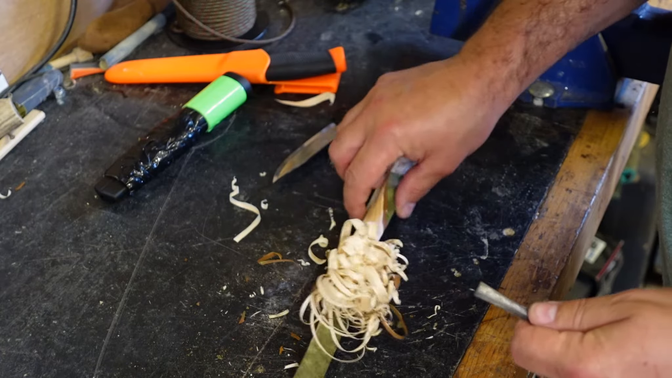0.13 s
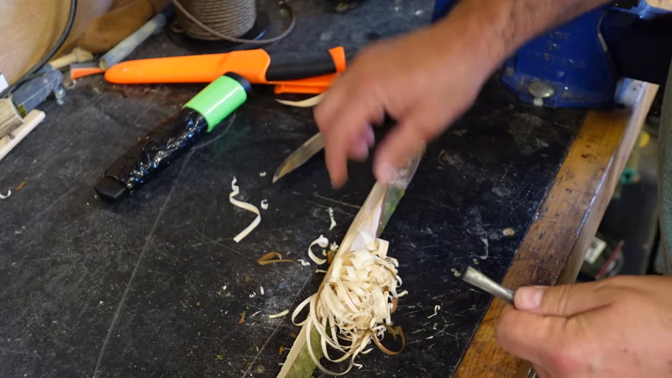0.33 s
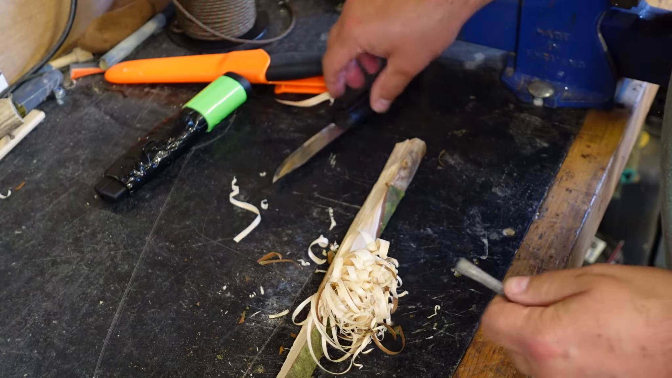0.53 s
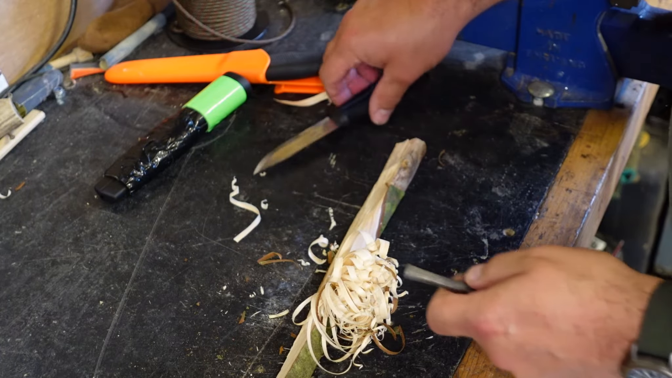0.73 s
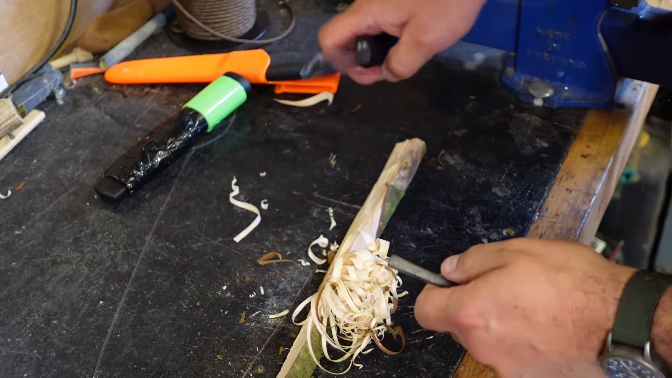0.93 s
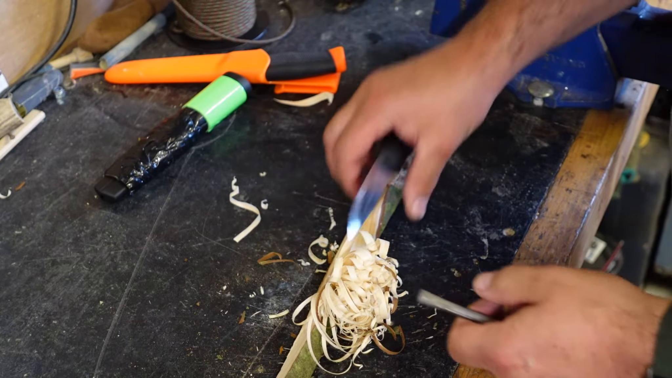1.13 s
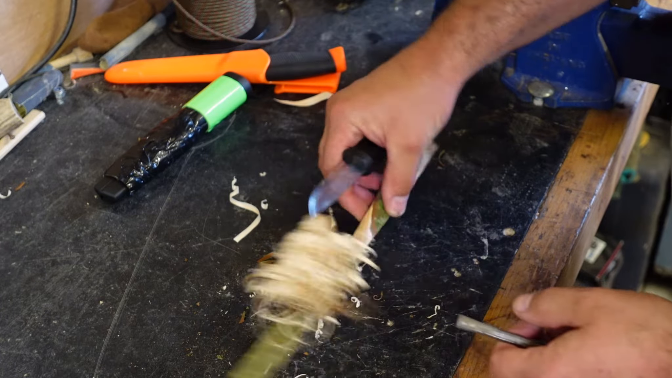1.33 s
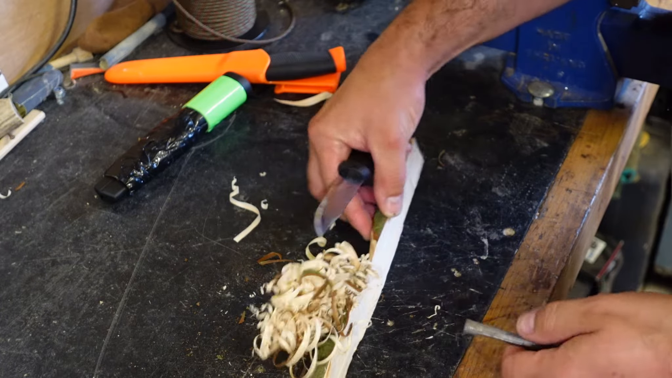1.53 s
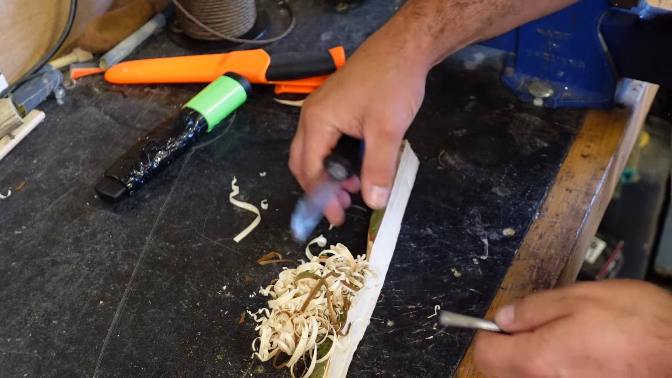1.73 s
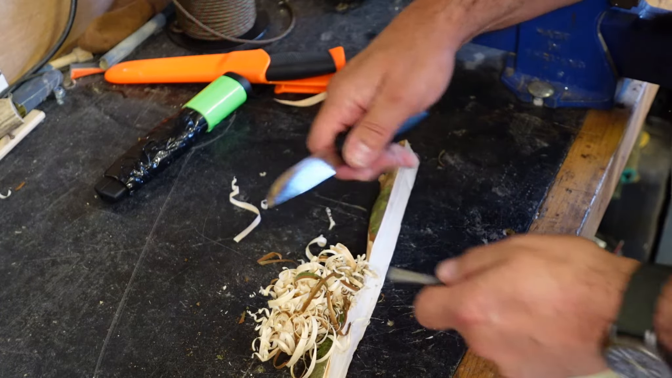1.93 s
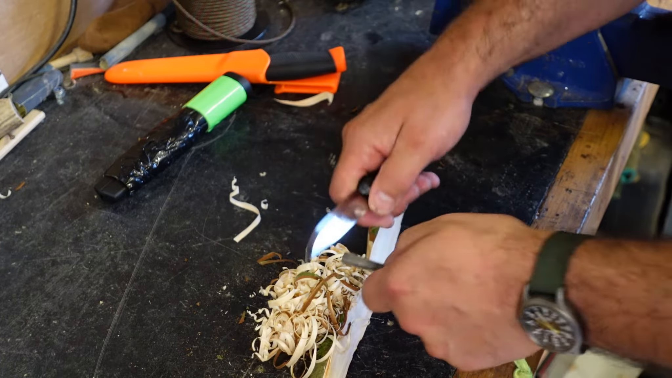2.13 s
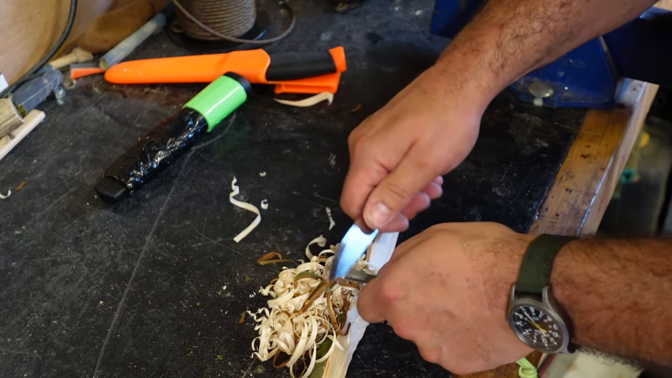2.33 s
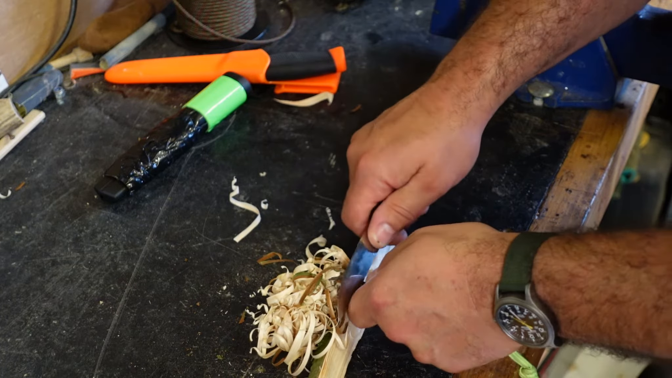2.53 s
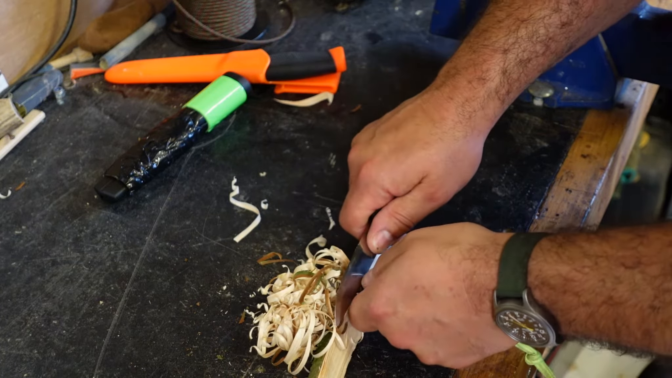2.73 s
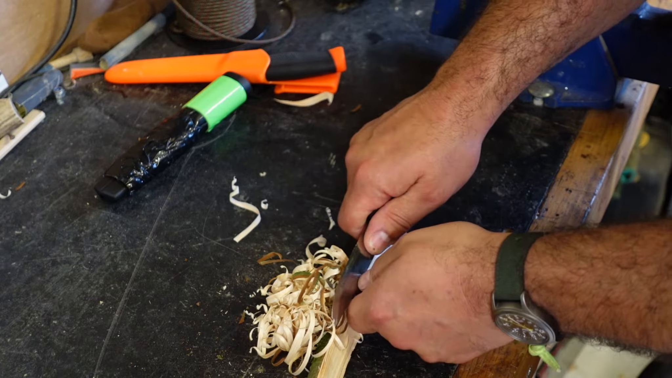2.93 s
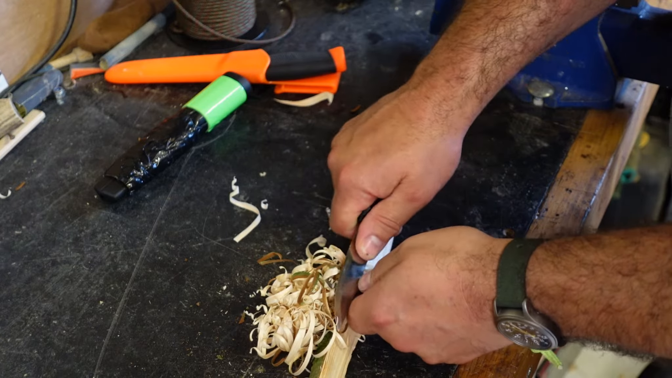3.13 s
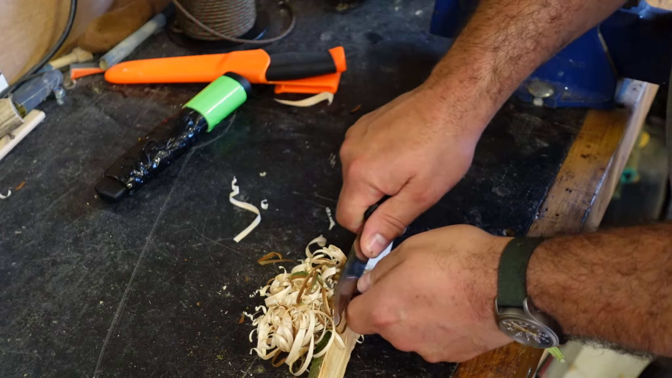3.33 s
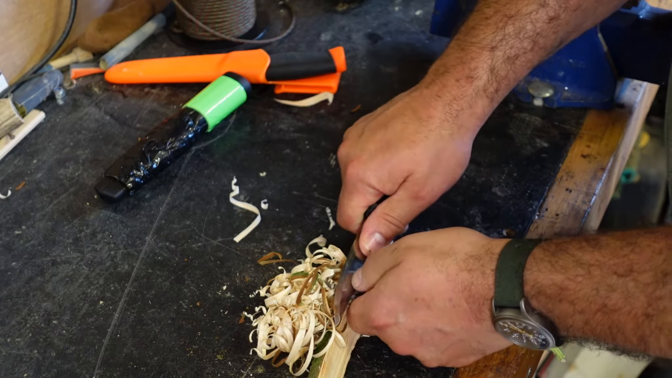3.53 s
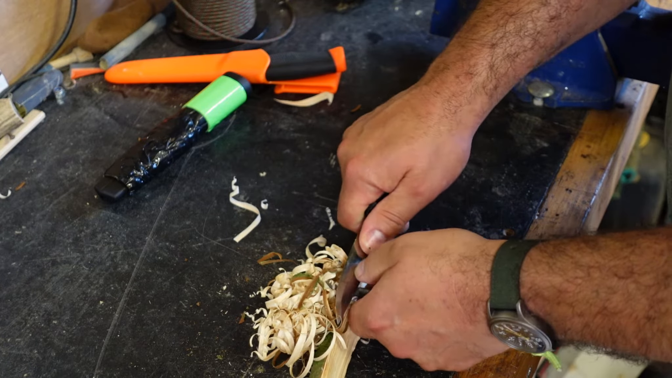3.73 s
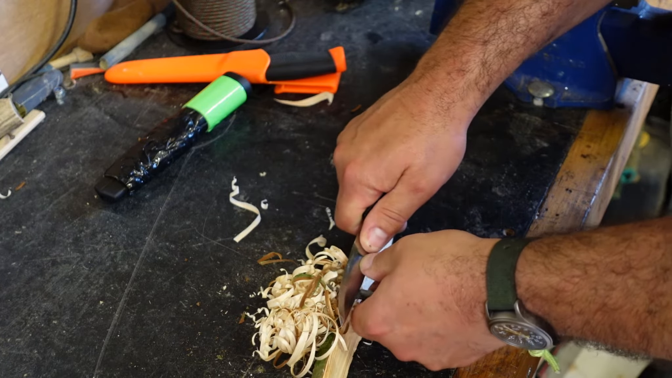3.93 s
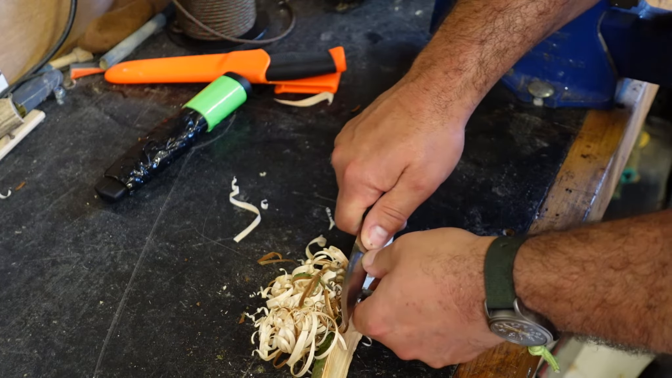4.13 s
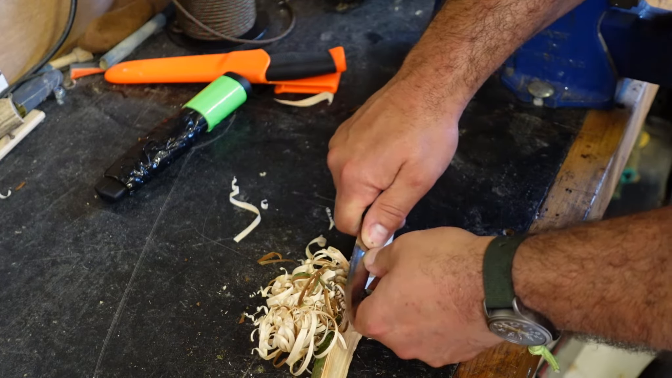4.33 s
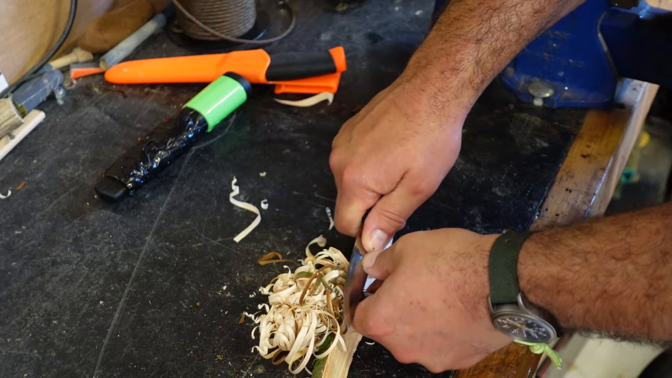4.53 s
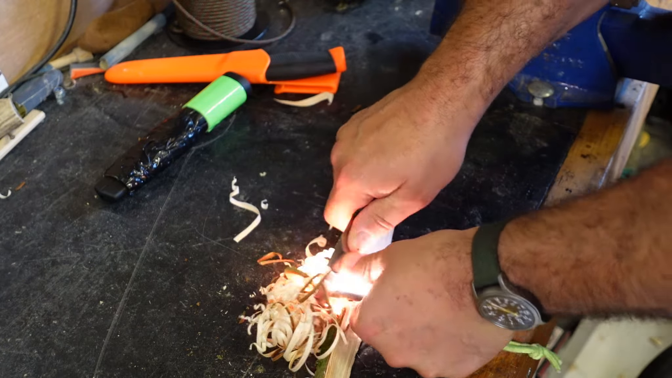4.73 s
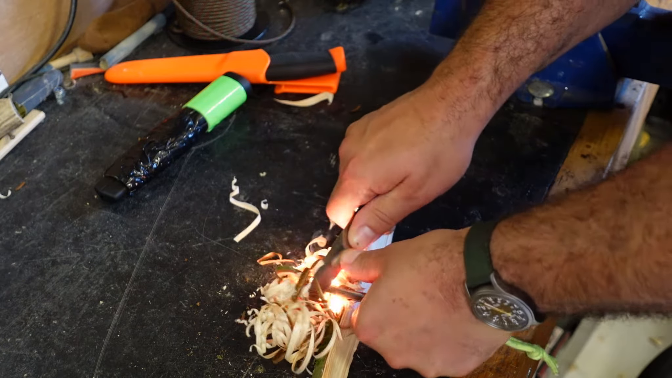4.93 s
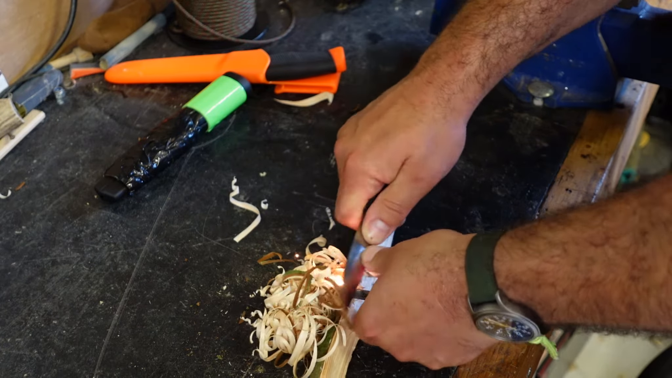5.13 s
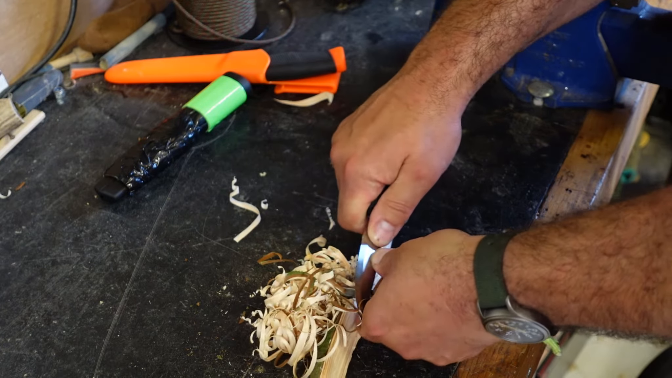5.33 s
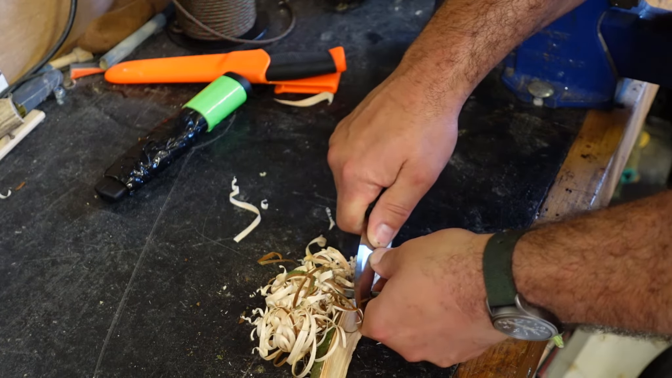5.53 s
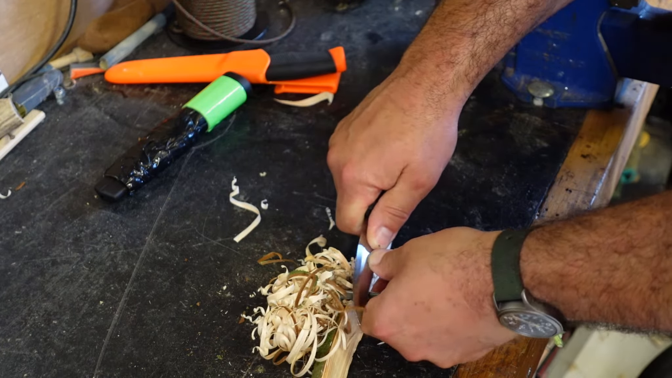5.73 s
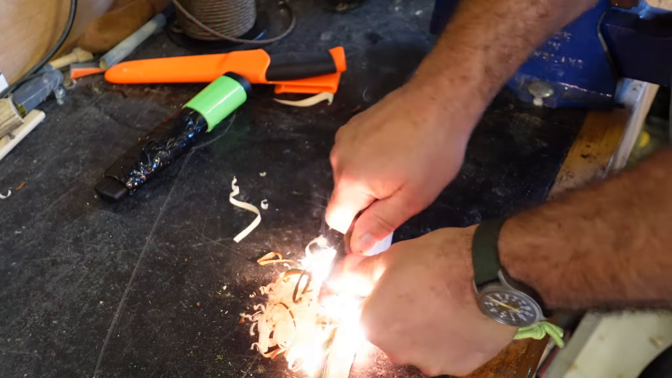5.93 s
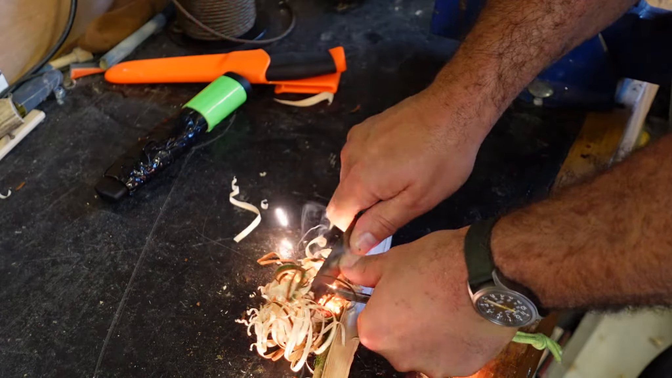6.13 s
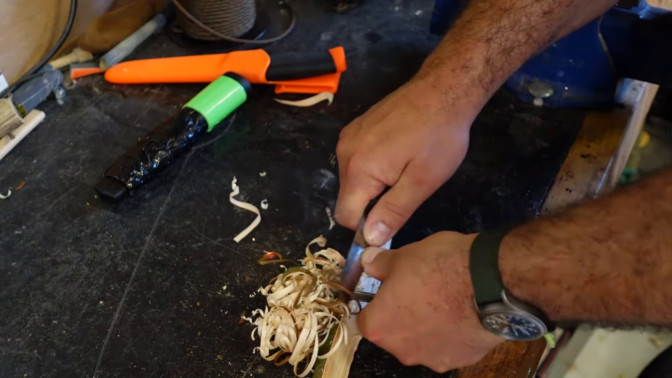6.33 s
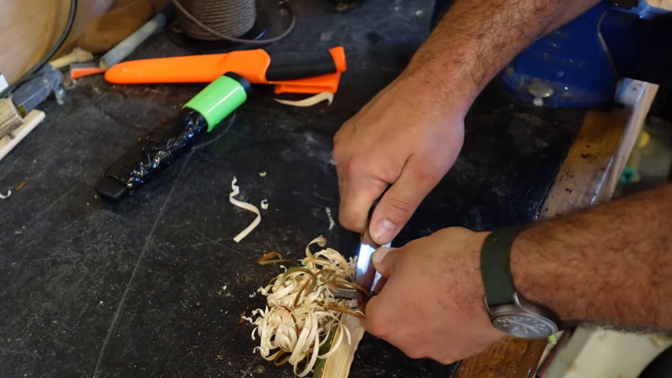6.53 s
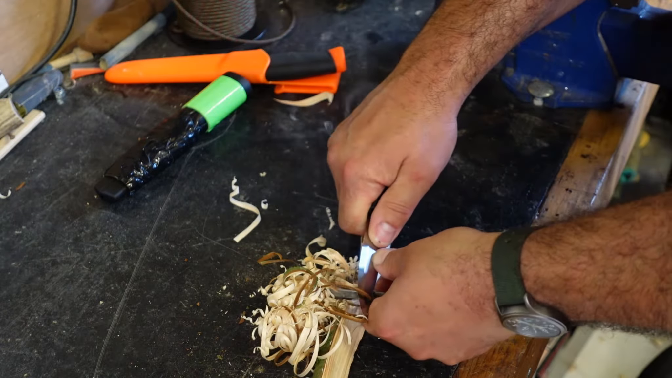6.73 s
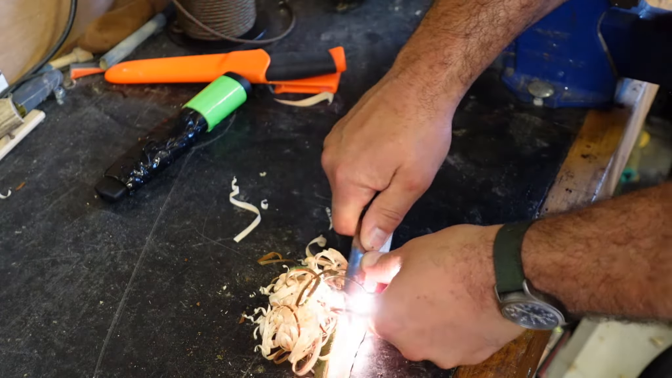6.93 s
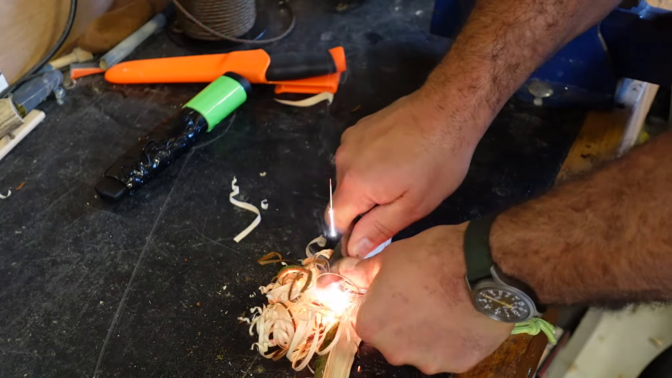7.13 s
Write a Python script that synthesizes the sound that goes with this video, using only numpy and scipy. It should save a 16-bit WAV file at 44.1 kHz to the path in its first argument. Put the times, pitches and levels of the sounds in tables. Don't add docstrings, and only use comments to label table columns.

```python
import sys
import numpy as np
from scipy import signal
from scipy.fft import rfft, irfft
from scipy.io import wavfile

SR = 44100
rng = np.random.default_rng(int(sys.argv[2]) if len(sys.argv) > 2 else 0)


def boost(x):
    u = np.asarray(x, float) / 20
    return 10 ** u


def master(y):
    cut = np.clip(np.atleast_2d(y).T, -1, 1)
    pcm = np.round(cut * 32767)
    wavfile.write(sys.argv[1], SR, pcm.astype(np.int16))


N = 316197

# time in seconds, chatter level in dB.
STROKE_PRESSURE = [
    [(4.585, -37), (4.595, -29.5), (4.757, -21), (4.81, -25.5), (4.873, -26.5), (4.89, -23.5), (4.939, -25),
     (5.0, -41.5)],
    [(5.78, -48), (5.8, -42), (5.828, -23.5), (5.998, -22), (6.094, -22.5), (6.12, -36), (6.143, -30.5)],
    [(6.92, -48), (6.952, -32), (7.038, -20), (7.102, -25.5), (7.17, -20.5)],
]
# centre in Hz, width in Hz, gain in dB.
STICK_MODES = [(656, 47, -1), (1190, 120, -2.5), (1512, 87, -1), (2556, 50, 2.5), (3950, 166, 6),
               (5770, 130, 2.5)]
LAID_DOWN_S, GRIP_S = 2.48, 2.41


def strokes():
    # start in seconds, peak in dB, depth into the rod in dB.
    slip_rows = [(4.5938, -7, -10), (4.6259, -3.5, -1), (4.6484, -4.5, -5), (4.661, -16, -4),
                 (4.679, -4.5, -1), (4.696, -8, -5), (4.723, -9, -7), (4.734, -0.5, 5.5), (4.751, -5.5, -2),
                 (4.7815, -10, 0), (4.8344, -3, 1), (4.887, -5, -2), (4.9185, -6, 1), (4.9298, -4, -3),
                 (5.7706, -22, -5), (5.7919, -11, 4), (5.8128, -8.5, 5), (5.829, -9, 0), (5.854, -5, 5),
                 (5.877, -5, 7), (5.8996, -3, 1), (5.932, -2.5, 5), (5.976, -11, 2), (5.984, -1.5, -4),
                 (6.018, -1.5, -5), (6.087, -11, -4), (6.8778, -24, 0), (6.91, -11.5, 2.5), (6.939, -21, 0),
                 (6.9675, -18, 0), (7.001, -6, -4), (7.021, -13, 0), (7.035, -10, 3), (7.06, -12, 5),
                 (7.07, -4, 7), (7.0863, -4, 9), (7.12, -1.5, 0), (7.139, -1.5, 4)]
    # frequency in Hz, density in dB per Hz.
    grind = [(1500, 7), (3000, 1), (5000, 3.5), (9000, 2.5), (13300, -3.5), (15800, -8)]
    # centre in Hz, width in Hz, gain in dB.
    blade_modes = [(3450, 20, 3), (3850, 570, -13), (3200, 690, -12), (4670, 176, 1.5), (5800, 75, -31),
                   (6200, 92, -13), (8600, 50, -48), (9100, 200, -14)]
    # centre in Hz, width in Hz, gain in dB.
    rod_modes = [(513, 19, -22), (545, 27, -12), (653, 70, -10), (767, 45, -6), (890, 8, -13),
                 (1100, 25, -1.5), (1516, 166, -4), (1765, 23, -1.5), (2240, 290, -18)]
    chatter = grit(per_s=500, spread_db=0.5, decay_s=0.002, bed=1.3)
    top, low, thrum, sing = pressure()
    start_s, peak_db, depth_db = np.transpose(slip_rows)

    bites = boost(-11.0) * bursts(np.c_[start_s, peak_db], decay_s=0.0054, rise_s=0.00065)
    dull_bites = bursts(np.c_[start_s, peak_db - 18 + depth_db], decay_s=0.0069, rise_s=0.0042)
    dull = low * chatter + boost(-1) * dull_bites

    sparks = chatter * np.sign(rng.standard_normal(N))
    hiss = highs(colour(top * sparks + highs(bites, 2470), grind))
    hiss = hiss / highs(colour(chatter, grind)).std()
    blade_push = sing * chatter + bites * sing / (top + 1e-9)
    blade = boost(8.0) * wander(blade_push, blade_modes, depth_db=5.3)
    rod_body = signal.sosfilt(signal.butter(2, [430, 2800], "band", fs=SR, output="sos"), dull)
    rod = boost(2.0) * wander(dull, rod_modes, depth_db=3.5) + boost(2.5) * rod_body
    return boost(-6.5) * hiss + blade + rod + thrum * bench(rng.standard_normal(N))


def pressure():
    t, out = np.arange(N) / SR, 0
    near_tip_s, edge_s = 0.21, 0.006
    for table in STROKE_PRESSURE:
        s, db = np.transpose(table)
        age = np.clip(t - s[0], 0, 1)
        late = np.maximum(age - near_tip_s, 0)
        fade = np.clip(np.minimum(t - s[0] + edge_s, s[-1] + edge_s - t) / edge_s, 0, 1)
        rod_db = -3.5 - 57 * late
        bench_db = -25 - 34 * late - 8 * np.exp(-age / 0.0093)
        blade_db = -1 - 2.5 * (10 * age) ** 2
        shares_db = np.array([0 * age, rod_db, bench_db, blade_db])
        out = out + fade * boost(np.interp(t, s, db) + shares_db)
    return out


def wander(x, modes, depth_db=4.0, rate_hz=7):
    out = 0
    for k, mode in enumerate(modes):
        out = out + (-1) ** k * boost(depth_db * flutter(rate_hz)) * ring(x, [mode])
    return out


def bench(push):
    thrum = ring(push, [(126, 24, 0), (210, 70, -9), (88, 25, -7), (290, 90, -13)])
    return band(thrum, 66, 380) + boost(-27) * band(push, 22, 60)


def rasps():
    # peak in seconds, rise in seconds,
    # fall in seconds, level in dB, ring in Hz.
    rasp_rows = [(2.585, 0.17, 0.16, -50, 3600), (2.66, .07, .1, -47, 4600), (2.87, 0.079, .08, -48, 4100),
                 (2.52, 0.024, .04, -58, 2560), (4.21, 0.06, .06, -59, 1900),
                 (4.312, 0.03, 0.04, -58, 1050), (4.49, 0.03, 0.04, -60, 1450),
                 (5.12, 0.012, 0.04, -50, 930), (5.12, .04, .06, -56, 770), (5.08, 0.02, 0.04, -50, 1520),
                 (5.122, .012, .04, -49, 1500), (5.12, .012, .05, -48, 2230),
                 (4.93, 0.054, 0.061, -38.5, 2170), (1.352, .03, .04, -53, 650),
                 (0.148, .04, .06, -60.5, 2620), (6.0, 0.11, 0.11, -37.5, 2720),
                 (1.23, 0.014, 0.035, -59, 5800), (1.335, 0.026, .04, -59, 2650),
                 (1.668, 0.033, 0.043, -56, 3930), (.35, .03, .06, -51, 2600), (.21, .06, .08, -60, 2600)]
    # peak in seconds, rise in seconds, fall in seconds, level in dB,
    # note in Hz.
    sing_rows = [(4.632, 0.03, .08, -37.5, 1790), (4.7, .08, 0.073, -35.5, 1790),
                 (4.75, .08, 0.12, -34, 2340), (4.75, 0.11, 0.19, -39, 558), (4.91, 0.067, .08, -41, 1550),
                 (5.86, 0.065, .08, -43, 1130), (5.938, .04, 0.036, -34, 1784),
                 (5.995, .06, 0.072, -31.5, 1786), (5.95, 0.13, 0.18, -43, 492),
                 (6.07, 0.072, 0.098, -44, 770), (6.92, 0.015, 0.03, -45, 640),
                 (6.945, .012, .04, -46, 640), (6.885, .01, .025, -53, 640),
                 (5.825, 0.025, 0.035, -39, 640), (7.015, 0.056, .05, -36, 593),
                 (7.02, .05, 0.11, -38, 880), (7.07, 0.11, 0.053, -35, 1800), (7.095, 0.07, .06, -32, 1588),
                 (.09, .006, .08, -54, 3950), (1.638, .006, .07, -50, 3930), (4.78, .1, .1, -41, 483),
                 (4.8, .1, .08, -43, 640), (.42, .008, .025, -60, 650)]
    rub = grit(per_s=630, spread_db=-2.5, decay_s=0.0064, bed=0.97)
    out = np.zeros(N)
    for rows, q in ((rasp_rows, 17), (sing_rows, 36)):
        for row in rows:
            hz = row[4]
            out += swells([row[:4]]) * unit(ring(rub, [(hz, hz / q, 0)]))
    return out


def handling():
    # frequency in Hz, density in dB per Hz.
    crackle = [(1200, -7.5), (2200, -9.5), (3200, 5), (4800, 7.5), (7000, 5), (10000, 4.5), (13000, 2),
               (15800, -2)]
    # centre in Hz, width in Hz, gain in dB.
    slide_modes = [(2560, 88, 1), (3950, 100, 10.5), (5400, 330, 2.5), (6740, 210, -4)]
    # centre in Hz, width in Hz, gain in dB.
    curl_modes = [(3700, 240, 5), (3680, 1100, 6)]
    grains = grit(per_s=700, spread_db=5, decay_s=.003, bed=.7)
    slide = grit(per_s=170, spread_db=1.5, decay_s=0.0054, bed=1.0)
    top, wood, thrum, sing = hands()
    hum = unit(ring(slide, STICK_MODES[:3])) + boost(2) * band(slide, 480, 2400)
    free = np.arange(N) / SR < LAID_DOWN_S
    hum = np.where(free, hum, boost(-5) * hum + boost(-9.5) * highs(hum, 730))
    slide_voice = boost(-11.5) * unit(ring(slide, slide_modes))
    curl_voice = boost(-4.5) * unit(ring(grains, curl_modes))
    voice = np.where(free, slide_voice, curl_voice)
    rub = boost(-6.0) * top * unit(colour(grains, crackle)) + boost(-10.5) * wood * hum + sing * voice
    return highs(rub, 195) + boost(-15.5) * thrum * bench(rng.standard_normal(N))


def hands():
    # peak in seconds, rise and fall in seconds per 20 dB, level in dB.
    brush_rows = [(.094, 0.022, 0.28, -49), (.27, 0.17, 0.14, -43.5), (.315, 0.012, 0.098, -46),
                  (.636, 0.0042, .03, -60), (1.228, 0.0059, 0.54, -55), (1.362, 0.1, 0.048, -39),
                  (1.48, 0.007, 0.2, -41), (1.64, 0.08, 0.045, -48.5), (2.24, 0.025, 0.038, -91)]
    crush_rows = [(2.43, 0.027, 0.036, -48.5), (2.609, 0.27, 0.16, -38), (2.7, 0.31, 0.088, -39.5),
                  (2.89, 0.14, 0.1, -36), (2.961, 0.035, 0.1, -42.5), (3.09, 0.033, 0.022, -42),
                  (3.21, 0.17, 0.12, -48.5), (3.36, 0.082, 0.06, -43), (3.52, 0.22, 0.059, -44.5),
                  (3.7, 0.25, 0.27, -46.5), (3.85, 0.19, 0.049, -43.5), (4.0, 0.15, 0.088, -50),
                  (4.18, 0.028, 0.21, -55), (4.46, 0.15, 0.085, -41.5), (4.56, 0.046, 0.11, -41.5),
                  (4.96, 0.056, 0.2, -34.5), (5.04, .06, .1, -40), (5.077, 0.089, 0.086, -29),
                  (5.119, 0.026, 0.064, -28), (5.604, 0.12, 0.45, -47.5), (5.769, 0.0054, 0.045, -34),
                  (6.1, 0.018, 0.022, -50), (6.185, 0.051, 0.17, -32), (6.307, 0.017, 0.28, -45),
                  (6.572, 0.031, 0.024, -46), (6.844, 0.057, 0.068, -45), (6.88, 0.012, 0.027, -40),
                  (6.913, 0.0096, 0.018, -50), (6.95, 0.026, .02, -47)]
    rub_rows = [(.1, 0.021, 0.12, -68), (.33, 0.0093, 0.082, -38), (.64, .01, 0.046, -65),
                (.72, .08, .2, -83), (1.362, 0.057, 0.16, -51), (1.65, 0.034, 0.1, -47),
                (2.43, 0.031, 0.23, -56), (2.89, 0.13, 0.088, -53.5), (3.45, 0.7, 0.12, -57),
                (4.01, 0.13, 0.034, -51), (4.2, 0.052, 0.099, -51.5), (4.31, 0.065, 0.1, -48),
                (4.51, 0.15, 0.029, -54), (4.58, 0.018, 0.023, -42), (4.95, 0.027, 0.094, -36),
                (5.1, 0.057, 0.24, -45), (5.77, 0.0063, 0.11, -34.5), (6.18, 0.33, 0.18, -37.5),
                (6.882, 0.0068, 0.027, -39), (6.93, 0.072, 0.17, -41)]
    lean_rows = [(.1, 0.036, 0.76, -51), (.33, .04, 0.074, -52), (.7, 0.055, 0.072, -50),
                 (1.23, 0.016, 0.065, -47), (1.5, 0.042, 0.25, -54), (2.43, 0.036, 0.18, -63),
                 (3.21, .12, 0.13, -56), (3.45, 0.093, .08, -61), (4.01, .08, 0.069, -74),
                 (4.26, 0.12, 0.14, -48.5), (5.0, .05, .3, -68), (6.14, .02, 0.16, -53),
                 (6.9, 0.075, 0.12, -47)]
    t = np.arange(N) / SR
    eased_db = -5 * (t > STROKE_PRESSURE[0][0][0])
    grip = boost(-57.5 + eased_db + 0.48 * flutter(2.9)) * (t > GRIP_S)
    crush = swells(crush_rows) * np.clip((t - GRIP_S) / 0.0085, 0, 1)
    top = np.sqrt(swells(brush_rows) ** 2 + crush ** 2 + grip ** 2)
    curl_db = np.maximum(-4.5 - 12 * np.maximum(t - 2.9, 0), -30)
    sing = top * boost(np.where(t < LAID_DOWN_S, -2, curl_db))
    return top, swells(rub_rows) + boost(-19.5) * top, swells(lean_rows), sing


def knocks():
    # start in seconds, peak in dB, brightness in dB, clear note in dB.
    knock_rows = [(0.088, -57, 13, -17), (0.3128, -21.5, -5, -5.5), (0.416, -42, -22, -26),
                  (0.636, -59, -6, -28), (0.683, -56, -5, -31), (1.219, -65, 8, -15),
                  (1.357, -36, -17, -22), (1.481, -55, 13, 12), (1.635, -34, -3, -15),
                  (2.229, -47, -9.5, -30), (2.429, -36.5, -9.5, -0.5), (2.893, -41.5, -6, -2.5),
                  (3.433, -40, -8, -31), (4.0, -47, 2, -29), (4.47, -46.5, 5, -10), (5.118, -54, -19, -7),
                  (5.7706, -35, -8, -15), (6.189, -40, -12, -15), (6.71, -47, -4, -12),
                  (6.838, -50, 0, -15), (6.877, -39.5, -12, -13), (6.9095, -33, -17, -15),
                  (6.938, -30, -10, -15)]
    out, t = np.zeros(N + 8192), np.arange(8192) / SR
    hz, width, db = np.transpose(STICK_MODES)
    t60_s = 0.13
    shake = np.exp(-t / 0.0012) + boost(-24.0) * np.exp(-np.log(1000) * t / t60_s)
    for s, peak_db, bright_db, note_db in knock_rows:
        chance = rng.standard_normal((2, len(hz)))
        clear_note = np.arange(len(hz)) == 3
        size_db = db + chance[0] + bright_db * (hz > 3000) + (note_db + 6.5) * clear_note
        push = shake * np.minimum(.25 + t / .006, 1) * rng.standard_normal(8192)
        push = push + 5 * (t == 0)
        body = ring(push, np.c_[hz * (1 + .015 * chance[1]), width, size_db])
        clack = band(rng.standard_normal(8192), 800, 1650)
        clack = clack + boost(bright_db + 1.5) * band(rng.standard_normal(8192), 3800, 6800)
        i = int(s * SR)
        out[i:i + 8192] += boost(peak_db) * (boost(16) * body + boost(-3) * shake * clack)
    return highs(out[:N], 420)


def snaps():
    # start in seconds, peak in dB, centre in Hz.
    shaving_rows = [(0.083, -42, 3950), (0.109, -53, 3950), (0.143, -37, 6000), (0.166, -40, 6500),
                    (0.285, -29.5, 5860), (1.369, -30, 3950), (1.48, -33.5, 4070), (1.5303, -32.5, 4940),
                    (1.469, -39, 4070), (2.412, -49, 4000), (2.6995, -38, 4670), (2.774, -38.5, 9300),
                    (2.895, -38, 3960), (3.011, -39, 3450), (3.8052, -34, 6440), (3.854, -33, 7957),
                    (3.978, -42, 3950), (4.164, -42, 9600), (4.333, -41, 4330), (4.374, -37.5, 9300),
                    (4.4712, -46, 5040), (5.06, -29, 6910), (5.075, -23.5, 10900), (5.1152, -16.5, 11700),
                    (5.1166, -23, 5130), (5.283, -41.5, 8020), (5.386, -41.5, 12400), (5.542, -41.5, 11650),
                    (5.597, -36.5, 6200), (5.661, -37.5, 8930), (6.15, -26, 4700), (6.184, -19.5, 13800),
                    (6.3056, -37, 5830), (6.838, -33, 3480), (6.909, -29, 3450),
                    (1.22, -48, 5870), (1.258, -41, 5570), (1.325, -45, 2670), (1.507, -39, 3680),
                 (2.229, -55, 4020), (2.753, -41, 4450), (2.818, -41, 4530), (3.0684, -43, 4030),
                 (3.1323, -47, 4590), (3.1567, -43, 6010), (3.201, -46, 5780), (3.342, -42, 5240),
                 (3.4328, -42, 4040), (3.457, -43, 5120), (3.509, -41.5, 3510), (3.6734, -42, 8430),
                 (3.9255, -48, 2950), (3.9988, -40.5, 3260), (4.1031, -52, 4610), (4.435, -39, 5810),
                 (4.5247, -44, 5950), (4.5436, -49, 7960), (5.333, -43, 8945), (5.4705, -42, 9300),
                 (5.7285, -47, 5800), (5.815, -27, 4670), (5.8294, -29, 4570), (6.191, -25, 5500),
                 (6.266, -34, 5600), (6.5706, -43, 4770), (6.6222, -50, 7610), (6.876, -35, 5760),
                 (6.9367, -28, 3470)]
    out, t = np.zeros(N + 2048), np.arange(2048) / SR
    puff = (1 - np.exp(-t / .0007)) * np.exp(-t / .004)
    for s, db, hz in shaving_rows:
        noise = band(rng.standard_normal(2048), .82 * hz, 1.22 * hz)
        noise = noise + boost(-3) * band(rng.standard_normal(2048), 2500, 16000)
        i = int(s * SR)
        out[i:i + 2048] += boost(db - 6) * noise * puff
    return out[:N]


def thuds():
    # start in seconds, peak in dB, length in
    # seconds.
    thud_rows = [
        (0.081, -50.5, 0.033),
        (0.629, -54.5, 0.057),
        (0.686, -54, 0.12),
        (1.329, -54.5, 0.16),
        (2.423, -51.5, 0.019),
        (3.998, -51.5, 0.026),
        (4.206, -55, 0.042),
    ]
    out, t = np.zeros(N + 8192), np.arange(8192) / SR
    for s, db, length in thud_rows:
        shape = (1 - np.exp(-t / .006)) * np.exp(-t / length)
        i = int(s * SR)
        out[i:i + 8192] += boost(db - 4) * band(rng.standard_normal(8192), 140, 720) * shape
    return out[:N]


def bird():
    # start in seconds, length in seconds, start in Hz, end in Hz, level in dB.
    note_rows = [
        (0.694, 0.089, 7800, 7670, -70),
        (0.841, 0.25, 3830, 3570, -71),
        (0.855, 0.19, 3400, 3330, -68),
        (0.97, 0.085, 3850, 4140, -69),
        (1.049, .07, 4130, 3900, -72),
        (1.053, 0.14, 3700, 3460, -71.5),
        (1.994, 0.015, 7800, 5100, -50),
        (2.014, 0.02, 7850, 5730, -59),
        (2.032, 0.032, 7900, 6430, -61),
        (6.654, 0.026, 7350, 5140, -52),
    ]
    out = np.zeros(N)
    for s, length, hz0, hz1, db in note_rows:
        t = np.arange(int(length * SR)) / SR
        whistle = signal.chirp(t, hz0, length, hz1) * np.sin(np.pi * t / length) ** .5
        i = int(s * SR)
        out[i:i + len(t)] += boost(db) * whistle
    return np.array([echo(out * (0.33 + flutter(80)), 0.25) for _ in range(2)])


def air():
    # frequency in Hz, density in dB per Hz.
    air_shape = [(25, -28), (50, -21), (100, -6), (160, -7), (220, -3), (320, -1), (630, -3), (1000, -4),
                 (1380, -5), (1560, 3), (1750, -6), (2400, -10.5), (4500, -13), (15900, -21)]
    # frequency in Hz, density in dB per Hz.
    port_shape = [(15, -98), (25, -38), (262, 1.5), (984, -3), (1330, -2), (1480, 0), (4470, -14.5),
                  (7260, -18), (15900, -30)]
    mid = unit(colour(rng.standard_normal(N), air_shape))
    side = unit(colour(rng.standard_normal(N), port_shape))
    return boost(-67) * (mid + np.array([side, -side]))


def grit(per_s, spread_db, decay_s, bed):
    breaks = (rng.random(N) < per_s / SR) * boost(spread_db * np.minimum(rng.exponential(size=N), 3))
    swell = signal.lfilter([1], [1, -np.exp(-1 / (decay_s * SR))], breaks)
    return unit((np.clip(bed, 0, 9) + swell / swell.mean()) * rng.standard_normal(N))


def bursts(rows, decay_s, rise_s):
    out, t = np.zeros(N + 4096), np.arange(4096) / SR
    puff = (1 - np.exp(-t / rise_s)) * np.exp(-t / decay_s)
    for s, db in rows:
        i = int(s * SR)
        out[i:i + 4096] += boost(db) * puff * rng.standard_normal(4096)
    return out[:N]


def swells(rows):
    t, power = np.arange(N) / SR, np.zeros(N)
    for s, rise, fall, db in rows:
        a, b = max(int((s - 3 * rise) * SR), 0), int((s + 3 * fall) * SR)
        away = np.maximum((s - t[a:b]) / rise, (t[a:b] - s) / fall)
        power[a:b] += boost(db - 20 * away) ** 2
    return np.sqrt(power)


def ring(x, modes):
    out = 0
    for k, (hz, width, db) in enumerate(modes):
        out = out + (-1) ** k * boost(db) * signal.lfilter(*signal.iirpeak(hz, hz / width, SR), x)
    return out


def colour(x, points):
    hz, db = np.transpose(points)
    bins_hz = np.arange(2049) * SR / 4096
    log_gain = np.interp(np.log(bins_hz + 1), np.log(hz), db) * np.log(10) / 20
    c = irfft(log_gain)
    c[1:2048] *= 2
    c[2049:] = 0
    return signal.fftconvolve(x, irfft(np.exp(rfft(c))))[:len(x)]


def band(x, lo_hz, hi_hz):
    sos = signal.butter(2, [lo_hz, min(hi_hz, .45 * SR)], "band", fs=SR, output="sos")
    return unit(signal.sosfilt(sos, x))


def highs(x, hz=2500):
    return signal.sosfilt(signal.butter(3, hz, "high", fs=SR, output="sos"), x)


def flutter(hz):
    return unit(signal.sosfilt(signal.butter(2, hz, fs=SR, output="sos"), rng.standard_normal(N)))


def unit(x):
    return x / np.sqrt(np.mean(x ** 2) + 1e-30)


def echo(x, t60):
    t = np.arange(int(t60 * SR)) / SR
    tail = rng.standard_normal(len(t)) * np.exp(-np.log(1000) * t / t60)
    return signal.fftconvolve(x, tail / np.sqrt(np.sum(tail ** 2)))[:N]


def scene():
    # frequency in Hz, side minus mid in dB.
    spread = [(60, -38), (125, -28), (300, -20), (1000, -14), (2000, -14), (4000, -13.8), (8000, -10.8),
              (13000, -9.5)]
    work = strokes() + rasps() + handling() + knocks() + snaps() + thuds()
    work = work + boost(-7.5) * echo(work, 0.11)
    scatter = colour(echo(work * flutter(40), .04), spread)
    side = scatter + boost(-21) * highs(work, 3000) + boost(-26) * highs(work, 400)
    return np.array([work + side, work - side]) + bird() + air()


def top_cut(x):
    return signal.sosfilt(signal.butter(12, 16820, fs=SR, output="sos"), x)


def record(dry):
    top_hz = 15950
    mix = signal.sosfilt(signal.ellip(10, .3, 70, top_hz, fs=SR, output="sos"), dry)
    return top_cut(mix)


dry = scene()
out = record(dry)
master(out)
```